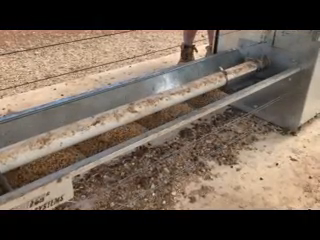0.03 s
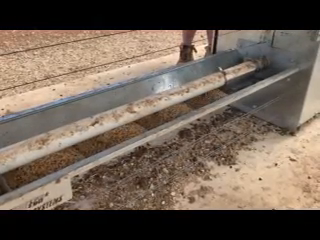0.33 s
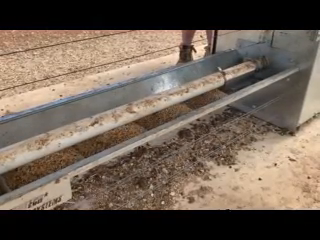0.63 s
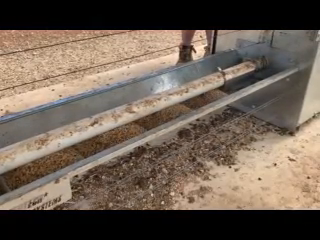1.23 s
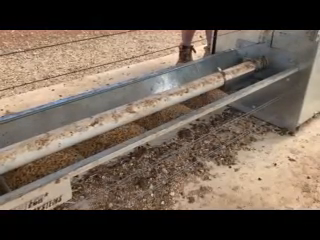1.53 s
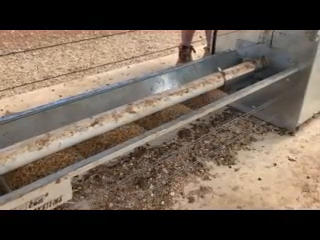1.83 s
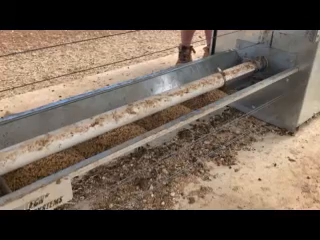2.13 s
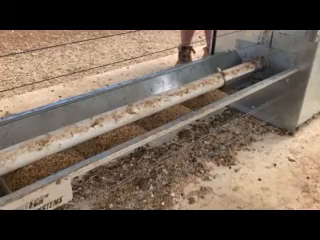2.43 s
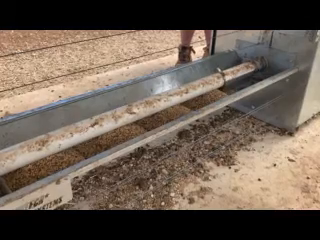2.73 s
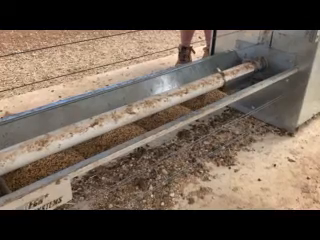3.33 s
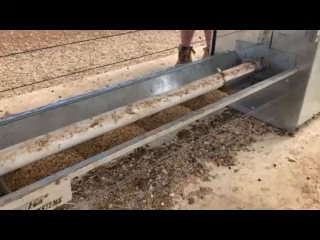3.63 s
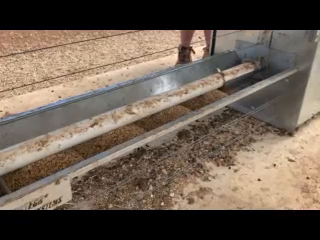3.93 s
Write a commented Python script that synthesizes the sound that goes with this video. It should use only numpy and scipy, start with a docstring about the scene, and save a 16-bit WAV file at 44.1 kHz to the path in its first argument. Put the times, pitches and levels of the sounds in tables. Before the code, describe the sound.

Grain rustles and hisses steadily as a feed auger churns it along a steel trough outdoors. Occasional spills and clanks ring thinly over a low motor hum, while wind thumps the microphone, mostly in the first half.

```python
"""Grain clatters on steel and wind thumps the microphone as a feed auger turns in its trough outdoors.
The screw churns the grain along, and countless tiny kernel impacts merge into a rustle.
A fine, steady high hiss above 8 kHz flutters with the rustle.
A few spills and clanks of the screw set the steel ringing thinly, over the motor's wavering hum.
The wind rumbles, with thumps and short flaps that drop in pitch, mostly in the first two seconds."""
import sys
import numpy as np
from scipy import signal
from scipy.fft import rfft, irfft, next_fast_len
from scipy.io import wavfile
from scipy.ndimage import uniform_filter1d, map_coordinates

SR = 44100
rng = np.random.default_rng(int(sys.argv[2]) if len(sys.argv) > 2 else 0)


def store_pcm(level_fs):
    """Save levels as 16-bit WAV."""
    pcm = np.round(np.clip(level_fs, -1, 1) * 32767).astype(np.int16)
    wavfile.write(sys.argv[1], SR, np.atleast_2d(pcm).T)


N = 176400

# fader rides for the grain's low churn and its rustle (time [s], level before trim [dB])
CHURN_RIDE = [(0, -39), (.14, -37.5), (.38, -37.5), (.45, -34.5), (.52, -39), (.58, -31.5), (.64, -38.5),
              (.7, -31), (.73, -38.5), (.85, -38), (1.0, -37.5), (1.25, -35.5), (1.5, -38.5), (1.87, -39),
              (1.97, -32.5), (2.1, -42.5), (2.25, -36), (2.3, -39), (2.4, -40.5), (2.54, -33.5),
              (2.64, -38.5), (2.74, -32), (2.88, -42), (2.99, -36), (3.1, -41), (3.33, -37.5),
              (3.48, -39.5), (3.6, -36.5), (3.7, -38), (3.79, -37), (4, -39.5)]
RUSTLE_RIDE = [(0, -38), (.3, -36.5), (.4, -38), (.5, -37.5), (.62, -39), (.82, -38), (1.15, -38),
               (1.28, -37), (1.37, -37), (1.44, -38), (1.85, -38), (1.95, -38), (2.4, -39), (2.55, -37.5),
               (2.63, -38), (2.71, -35.5), (2.8, -37.5), (2.86, -39), (3.25, -39), (3.4, -38),
               (3.68, -38.5), (3.93, -37.5), (4, -38.5)]
# tone of each layer (frequency [Hz], relative level [dB])
CHURN_EQ = [(25, -14), (55, -10), (85, 3), (140, 0.5), (200, 3.5), (300, 4.5), (420, 2), (660, 0.5),
            (1000, -4.5), (1300, -7), (1800, -14.5), (4000, -43)]
RUSTLE_EQ = [(200, -4), (900, -3), (1500, -0.5), (1950, 0.5), (2450, -2), (3200, 0), (3800, 1), (4700, -1),
             (5450, -3), (6100, 2.5), (7000, -4), (7850, -3), (8200, -15), (15000, -32)]
# stereo image of each layer (frequency [Hz], likeness of the ears [0 wide, 1 narrow])
CHURN_IMAGE = [(100, 0.6), (300, 0.77), (550, 0.31), (1200, 0.04)]
RUSTLE_IMAGE = [(1200, 0.72), (2000, 0.059), (3000, 0.076), (4800, 0.17), (5400, 0.18), (6300, 0.17),
                (7200, 0.84), (8200, 0.99)]
EAR_LAG_S, EAR_TURN_RAD = .000313, 1.08  # delay and phase turn, left against right

def grain(flutter, churn_trim_db=5, rustle_trim_db=6, tumble_db=1.6, flutter_db=.5):
    """The screw churns the grain against the trough; countless tiny kernel impacts merge into a rustle."""
    churn = patchy(ticking_noise(per_s=250, ticks_db=-8), depth_db=4)
    churn = spread(churn, CHURN_EQ, CHURN_IMAGE)
    rustle = patchy(ticking_noise(per_s=1200, ticks_db=-7.5), depth_db=3)
    rustle = spread(rustle, RUSTLE_EQ, RUSTLE_IMAGE, EAR_LAG_S, EAR_TURN_RAD)
    return (churn * amp(curve(CHURN_RIDE) + churn_trim_db + tumble_db * wobble(35.35))
            + rustle * amp(curve(RUSTLE_RIDE) + rustle_trim_db + flutter_db * flutter))


# heaps sliding off the screw (centre time [s], level [dB], half length [s])
SLIDE_CUES = [(0.684, -38, .025), (1.28, -37, .06), (2.54, -33.5, 0.05), (2.74, -37, 0.066),
              (3.92, -45, .025)]
# their bright tone (frequency [Hz], relative level [dB])
SLIDE_EQ = [(2500, -25), (5000, 0), (6200, 0), (7700, -2), (8500, -25), (12000, -45)]

def slides():
    """Each sliding heap is a brief swell of bright hiss."""
    t = np.arange(N) / SR
    swells = sum(amp(db) * np.exp(-.5 * ((t - centre) / half) ** 2) for centre, db, half in SLIDE_CUES)
    hiss = ticking_noise(per_s=1400, ticks_db=1)
    return swells * spread(hiss, SLIDE_EQ, RUSTLE_IMAGE, EAR_LAG_S, EAR_TURN_RAD)


# grain spilling on the steel (time [s], level [dB], decay t60 [s])
CLATTER_CUES = [(0.0, -19.5, 0.033), (.441, -28.5, 0.095), (1.261, -34, 0.17), (1.419, -28.5, 0.069),
                (1.444, -33.5, 0.13), (2.719, -26.5, 0.077), (2.735, -38, 0.055)]
# tone of a spill (frequency [Hz], relative level [dB])
CLATTER_EQ = [(200, 6), (600, -15), (1500, 2), (2200, 3.5), (3100, 9), (3900, 7.5), (4600, -3), (7000, -1),
              (12000, -62)]

def clatters(attack_s=.0006, ring_db=-9, rub_db=-53):
    """Handfuls of kernels spill on the steel and settle; steady rubbing keeps it faintly ringing."""
    envelope = np.zeros(N)
    for start, db, t60 in CLATTER_CUES:
        age = np.maximum(np.arange(N) / SR - start, 0)
        envelope += amp(db - 60 * age / t60) * (1 - np.exp(-age / attack_s))
    rattle = patchy(ticking_noise(per_s=1900, ticks_db=2.5), depth_db=5)
    spill = envelope * spread(rattle, CLATTER_EQ, image=[(1000, .79)])
    contact = spread(rng.standard_normal((2, N)), eq=[(1000, 0)], image=[(1000, .4)])  # white, wide
    push = (amp(rub_db) + amp(ring_db) * envelope) * contact
    return spill + steel(push)


# ringing modes of the auger and trough (frequency [Hz], relative level [dB], decay t60 [s])
STEEL_MODES = [(874, -7, .06), (1511, -7, .35), (1940, -11, .1), (2287, -8, .12), (2629, -5, .26),
               (2940, -8, .1), (3080, -7, .05), (3311, -5, .2), (3660, -6, .09), (3800, -7, .06),
               (3960, -7, .12), (4110, -9, .12), (4470, -11, .15)]

def steel(push):
    """The steel rings in its modes whenever the grain pushes on it."""
    t = np.arange(SR // 2) / SR
    out = np.zeros((2, N))
    for hz, db, t60 in STEEL_MODES:
        ring = amp(-60 * t / t60) * np.sin(2 * np.pi * hz * t)
        ring /= np.linalg.norm(ring)
        out += amp(db) * signal.fftconvolve(push, ring[None], axes=1)[:, :N]
    return out


# the screw striking the trough
# (time [s], level [dB], focus [Hz], spread [octaves], damping by the grain t60 [s])
CLANK_CUES = [(.439, -29, 3600, .12, .06), (.442, -19.5, 3400, .2, 0.08), (0.4428, -29, 2700, .07, .9),
              (0.4423, -22, 955, 0.38, .2), (1.261, -29, 3350, .13, .35), (1.376, -31, 3930, .06, .3),
              (1.598, -32, 2630, .05, 0.61), (1.598, -28.5, 3950, .1, .4), (1.611, -31, 4450, 0.088, .3),
              (2.252, -23, 720, .5, .09), (2.696, -20.5, 3150, .18, .12), (2.72, -23, 3530, .2, .11),
              (2.7195, -29, 1300, .4, .1), (3.733, -29, 1940, .1, .15)]

def clanks(attack_s=.002, ring_db=1, crunch_db=-2, crunch_t60=.049, ear_scatter_cycles=.094):
    """Each blow crunches briefly and rings those modes of the steel that its place of contact favours."""
    t = np.arange(SR // 2) / SR
    out = np.zeros((2, N + len(t)))
    for start, db, focus_hz, octaves, damping_t60 in CLANK_CUES:
        focus = lambda hz: np.exp(-.5 * (np.log2((hz + 1) / focus_hz) / octaves) ** 2)
        ring = np.zeros((2, len(t)))
        for hz, mode_db, t60 in STEEL_MODES:
            ear_cycles = rng.normal(rng.random(), ear_scatter_cycles, (2, 1))
            ring += focus(hz) * amp(mode_db - 60 * t / t60) * np.sin(2 * np.pi * (hz * t + ear_cycles))
        ring /= np.linalg.norm([focus(hz) * amp(mode_db) for hz, mode_db, _ in STEEL_MODES])
        crunch = unit(filtered(rng.standard_normal((2, len(t))), focus))
        crunch *= amp(crunch_db - 60 * t / crunch_t60)
        envelope = amp(db - 60 * t / damping_t60) * (1 - np.exp(-t / attack_s))
        out[:, int(start * SR):][:, :len(t)] += envelope * (amp(ring_db) * ring + crunch)
    return out[:, :N]


# fader ride for the gusts (time [s], level before trim [dB])
WIND_RIDE = [(0, -22.5), (.2, -22), (.6, -19), (.87, -27), (1.0, -24.5), (1.16, -26), (1.35, -21),
             (1.7, -26), (1.95, -31), (2.1, -36), (2.5, -33), (2.65, -24), (2.82, -32), (2.87, -34),
             (3.82, -35.5), (3.95, -26), (4, -22)]
# their bass-heavy tone (frequency [Hz], relative level [dB])
WIND_EQ = [(15, -40), (30, -18), (45, -5.5), (68, -3.5), (100, -5), (150, -12), (240, -19), (450, -30.5),
           (1000, -36), (3000, -61)]

def wind(trim_db=-1, lumps_db=.5, stray_db=-41):
    """Wind buffets the microphone: a lumpy centred rumble, a faint one in each ear, and single eddies."""
    rumble, left, right = unit(filtered(rng.standard_normal((3, N)), lambda hz: amp(along(WIND_EQ, hz))))
    gusts = amp(curve(WIND_RIDE) + trim_db + lumps_db * wobble(23.74))
    return rumble * gusts + amp(stray_db) * np.array([left, right]) + eddies()


# wind hits, from soft thumps to short hollow flaps (time [s], peak [dB], low cut [Hz], high cut [Hz])
EDDY_CUES = [(0.051, -17.5, 160, 480), (0.067, -14.5, 75, 131), (.136, -4, 267, 393), (.154, -13, 182, 360),
             (0.198, -8, 70, 200), (.215, -6.5, 61, 80), (.218, -19.5, 480, 750), (0.2259, -12.5, 183, 324),
             (.273, -19, 114, 230), (0.301, -11, 58, 190), (.329, -16, 232, 486), (.355, -19, 144, 290),
             (.4, -13.5, 218, 420), (.436, -10.5, 103, 210), (.502, -13, 94, 180), (0.521, -17, 78, 125),
             (0.56, -17, 105, 202), (0.624, -16.5, 209, 360), (.699, -15.5, 330, 580),
             (0.719, -12.5, 88, 280), (.789, -22, 260, 480), (.826, -22, 90, 170), (.906, -28, 135, 270),
             (.913, -13, 78, 135), (.99, -14.5, 78, 180), (1.077, -10.5, 74.4, 125),
             (1.242, -11.5, 53.4, 90), (1.281, -15, 85, 377), (1.338, -8.5, 54, 250),
             (1.366, -14.5, 135, 290), (1.477, -11, 66.4, 196), (1.6229, -12.5, 116, 272),
             (1.671, -15, 115, 220), (1.765, -17, 100, 239), (1.8, -13.5, 67, 128), (1.92, -15, 80.5, 240),
             (1.987, -22, 290, 390), (1.998, -21, 300, 360), (2.6781, -10, 69, 412),
             (2.786, -13, 61.6, 109), (3.866, -22, 72, 130), (3.936, -14.5, 66.6, 116),
             (3.953, -10, 79.5, 317)]

def eddies(lag_cycles=1.3, low_slope=8, high_slope=3.85, tilt=1.19):
    """Each eddy is one push of pressure within a band; its lows trail its highs, so it drops in pitch."""
    size = 8192
    out = np.zeros(N + 2 * size)
    hz = np.fft.rfftfreq(size, 1 / SR) + 1
    for time, db, low_hz, high_hz in EDDY_CUES:
        low_cut = 1 / np.hypot(1, (low_hz / hz) ** low_slope)
        high_cut = 1 / np.hypot(1, (hz / high_hz) ** high_slope)
        band = hz ** -tilt * low_cut * high_cut
        # each frequency arrives lag_cycles of its own periods late
        phase = 2 * np.pi * (rng.random() - lag_cycles * np.log(hz))
        push = np.roll(irfft(band * np.exp(1j * phase)), size // 2)
        out[int(time * SR):][:size] += amp(db) * push / np.abs(push).max()
    return out[size // 2:][:N]


# fader ride for the high hiss (time [s], level before trim [dB])
HISS_RIDE = [(0.03, -38), (0.15, -36), (0.2, -38), (0.34, -35), (0.37, -39), (0.42, -37), (3.28, -38),
             (3.35, -36.5), (3.96, -38.5)]
# its tone (frequency [Hz], relative level [dB])
HISS_EQ = [(6500, -16), (7850, -38), (8100, 9.5), (8600, 3.5), (9400, 4), (9750, 5), (10200, 3.5),
           (11400, 5.5), (12500, 0.8), (12800, 8), (13050, 3), (13200, 4), (15700, -7)]
# its stereo image (frequency [Hz], likeness of the ears [0-1])
HISS_IMAGE = [(8000, 0.93), (8650, 0.99), (9300, 1), (10200, 0.9), (11100, 0.73), (11850, 1), (12500, 0.65),
              (13400, 0.67), (14200, .7), (15000, 0.95)]

def high_hiss(flutter, trim_db=5, flutter_db=.53):
    """A fine, steady high hiss above 8 kHz that flutters with the rustle."""
    hiss = ticking_noise(per_s=3000, ticks_db=-6.5)
    hiss = spread(hiss, HISS_EQ, HISS_IMAGE, EAR_LAG_S, EAR_TURN_RAD)
    return hiss * amp(curve(HISS_RIDE) + trim_db + flutter_db * flutter)


# tones of the motor's hum (frequency [Hz], level [dB])
MOTOR_TONES = [(101, -37), (246, -50.5)]

def motor(pitch_drift=.021, waver_db=4):
    """A low hum under everything, wavering with the load."""
    out = np.zeros(N)
    for hz, db in MOTOR_TONES:
        phase = 2 * np.pi * np.cumsum(hz * (1 + pitch_drift * wobble(24.66))) / SR
        out += np.sqrt(2) * amp(db + waver_db * wobble(16)) * np.sin(phase)
    return out


def ticking_noise(per_s, ticks_db):
    """Two channels of white noise with random ticks scattered through them."""
    ticks = (rng.random((2, N)) < per_s / SR) * rng.standard_normal((2, N))
    return rng.standard_normal((2, N)) + amp(ticks_db) * unit(ticks)


def patchy(pair, depth_db):
    """Narrow bands of the noise swell and fade on their own, as passing resonances."""
    bands = signal.stft(pair, nperseg=2048)[2]
    swells = uniform_filter1d(rng.standard_normal(bands.shape), size=4, axis=1)  # smooth in frequency
    swells = uniform_filter1d(swells, size=3, axis=2)  # and in time
    return unit(signal.istft(bands * amp(depth_db * unit(swells)), nperseg=2048)[1][:, :N])


def spread(pair, eq, image, lag_s=0, turn_rad=0):
    """Two unrelated signals become a coloured stereo pair of rms 1; the left may lag."""
    angle = lambda hz: np.arccos(np.clip(along(image, hz), -1, 1)) / 2
    colour = lambda hz: amp(along(eq, hz)) * [np.cos(angle(hz)), np.sin(angle(hz))]
    delay = lambda hz: np.exp(.5j * np.outer([1, -1], turn_rad - 2 * np.pi * hz * lag_s))
    mid, side = filtered(pair, colour)
    return unit(filtered(np.array([mid + side, mid - side]), delay))


def filtered(x, response):
    """Filter x by a gain given as a function of frequency."""
    n = x.shape[-1]
    padded = next_fast_len(n + 8192)
    return irfft(rfft(x, padded) * response(np.fft.rfftfreq(padded, 1 / SR)), padded)[..., :n]


def wobble(rate):
    """A smooth random curve, rate knots a second."""
    return map_coordinates(rng.standard_normal(2048), [np.arange(N) * rate / SR], mode="wrap")


def curve(points):
    """Join (time [s], value) points, one value per sample."""
    return np.interp(np.arange(N) / SR, *np.transpose(points))


def along(points, hz):
    """Read (frequency [Hz], value) points on a log axis."""
    knots_hz, values = np.transpose(points)
    return np.interp(np.log(hz + 1), np.log(knots_hz + 1), values)


def amp(db):
    """Decibels to gain."""
    return 10 ** (np.asarray(db) / 20)


def unit(x):
    """Scale to rms 1."""
    return x / np.sqrt(np.mean(x ** 2) + 1e-20)


# pan of the trough and the high hiss (frequency [Hz], left minus right [dB])
PAN = [(450, 0), (700, 1), (1050, 5), (1500, 0.3), (2050, -0.5), (2450, 6), (3200, 0.5), (5000, 0),
       (6400, -1.5), (7800, 0)]

def scene():
    """The trough sits a little to the left; motor and wind sit in the centre."""
    flutter = wobble(35.9)  # shared by the rustle and the high hiss
    trough = grain(flutter) + slides() + clatters() + clanks()
    pan = lambda hz: amp(np.outer([.5, -.5], along(PAN, hz)))
    return filtered(trough + high_hiss(flutter), pan) + motor() + wind()


def record(dry, fold_hz=260, threshold_db=-23.5, top_hz=15730):
    """Sustained rumble makes the recorder fold the bass to mono; nothing passes above top_hz."""
    mid, side = (dry[0] + dry[1]) / 2, (dry[0] - dry[1]) / 2
    low_mid, low_side = filtered(np.array([mid, side]), lambda hz: 1 / (1 + (hz / fold_hz) ** 6))
    rumble_power = np.abs(uniform_filter1d(low_mid ** 2, size=SR))  # averaged over one second
    excess = (rumble_power / amp(threshold_db) ** 2) ** 4
    side = side - low_side * excess / (1 + excess)
    return filtered(np.array([mid + side, mid - side]), lambda hz: hz < top_hz)


dry = scene()
out = record(dry)
store_pcm(out)
```